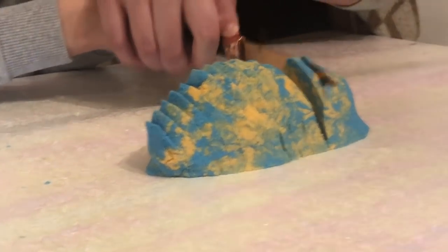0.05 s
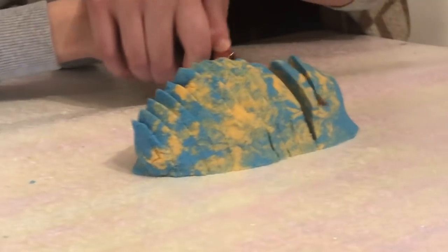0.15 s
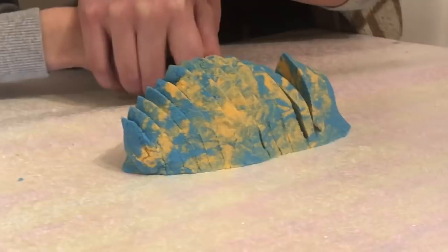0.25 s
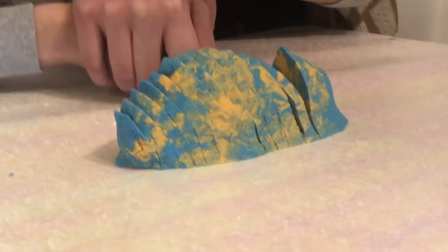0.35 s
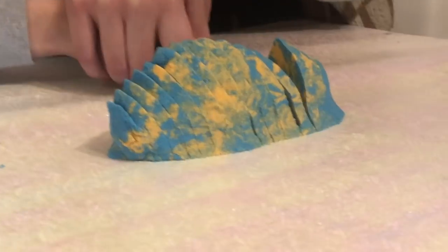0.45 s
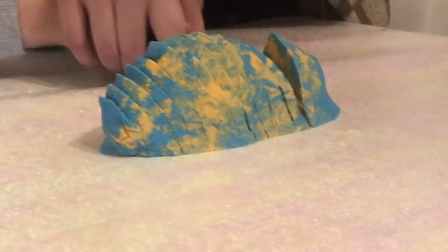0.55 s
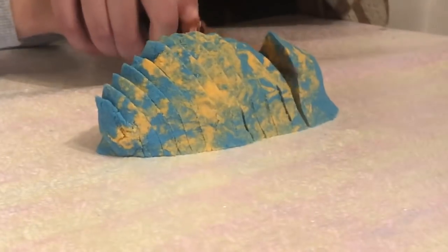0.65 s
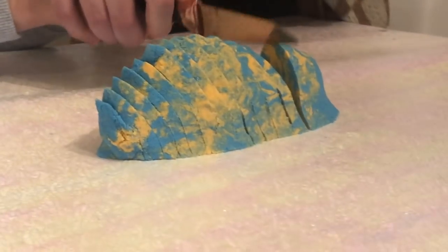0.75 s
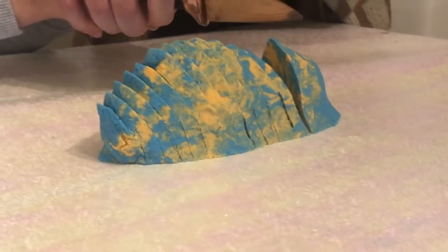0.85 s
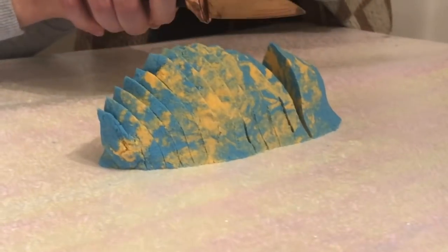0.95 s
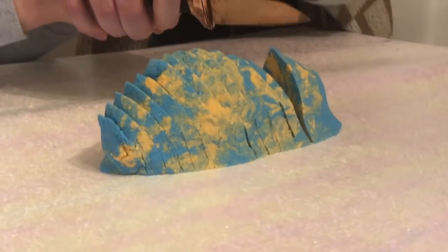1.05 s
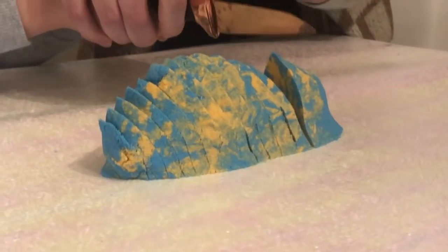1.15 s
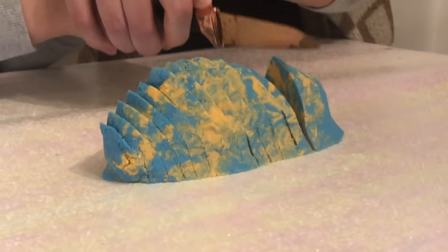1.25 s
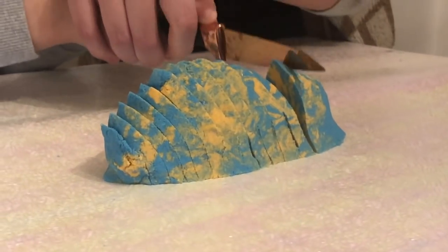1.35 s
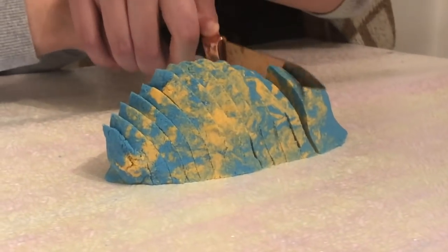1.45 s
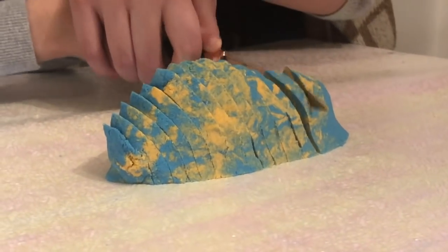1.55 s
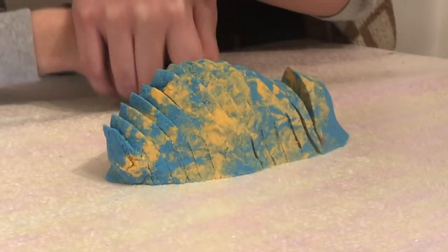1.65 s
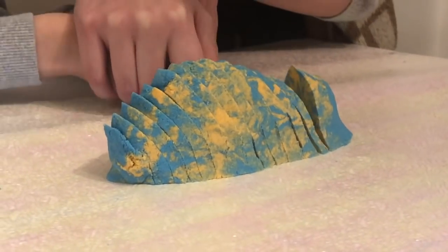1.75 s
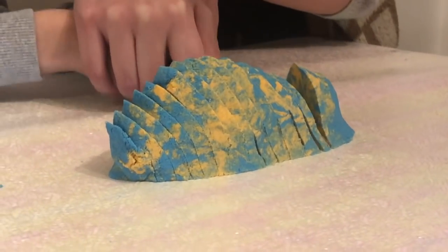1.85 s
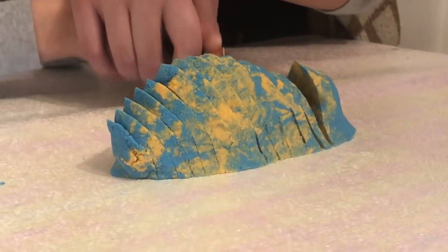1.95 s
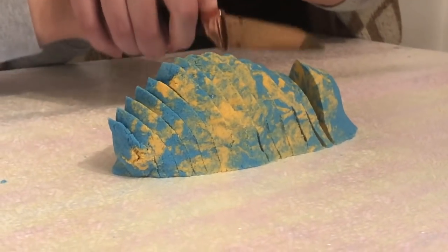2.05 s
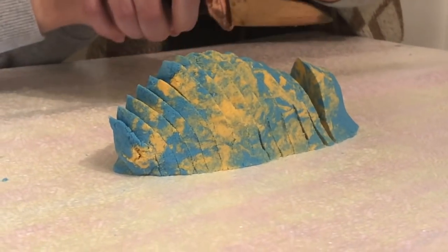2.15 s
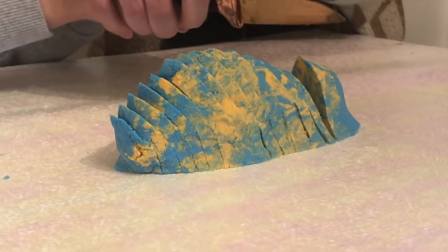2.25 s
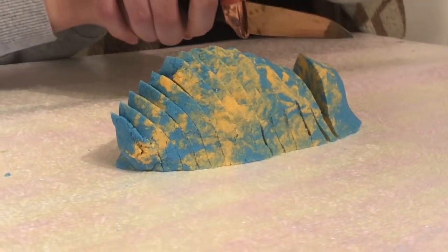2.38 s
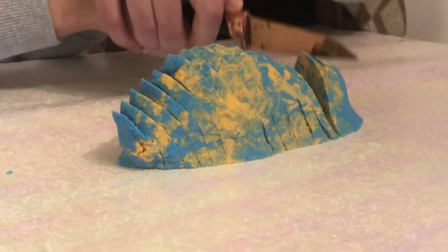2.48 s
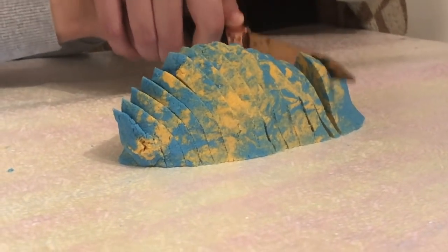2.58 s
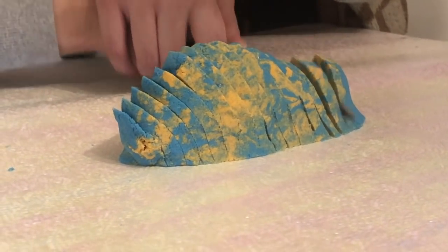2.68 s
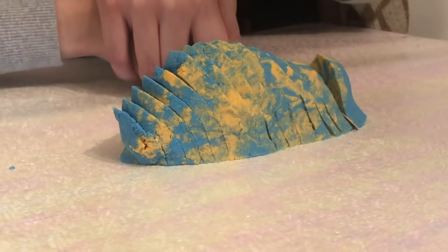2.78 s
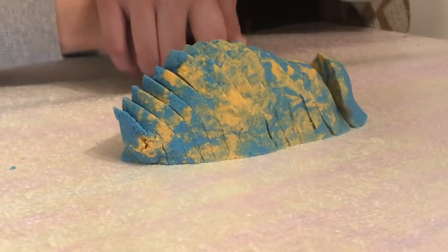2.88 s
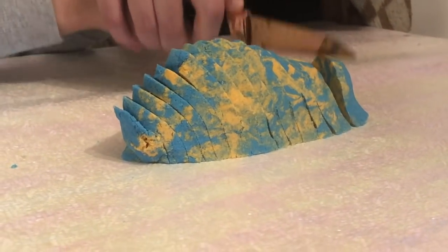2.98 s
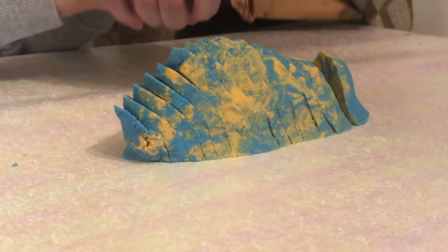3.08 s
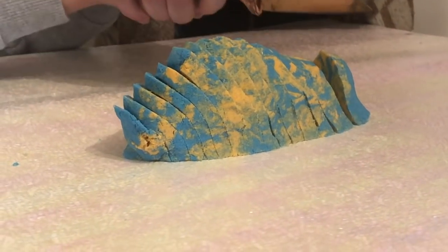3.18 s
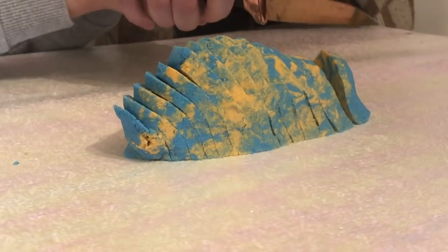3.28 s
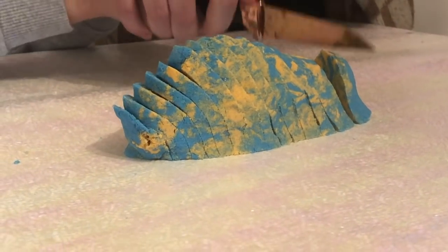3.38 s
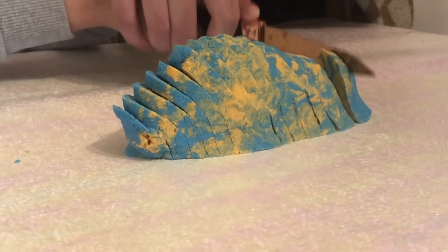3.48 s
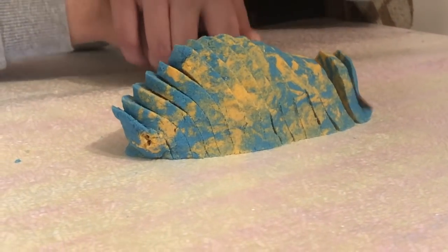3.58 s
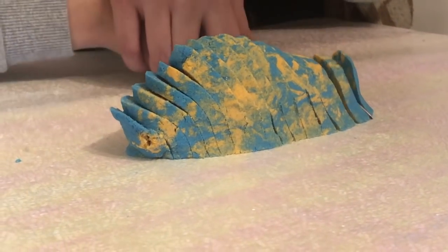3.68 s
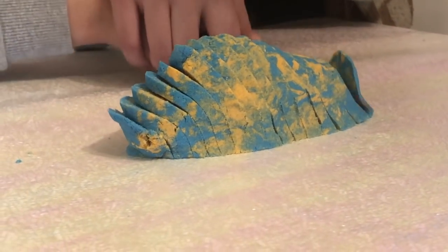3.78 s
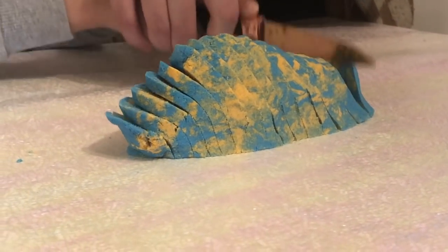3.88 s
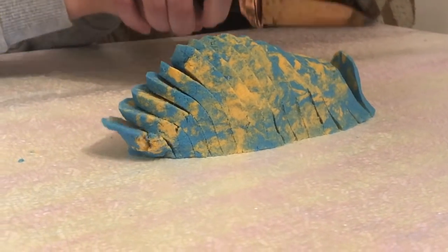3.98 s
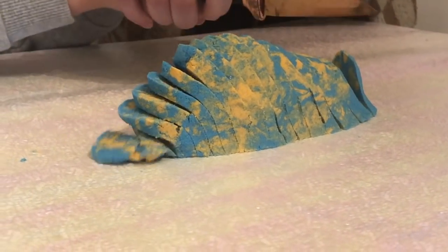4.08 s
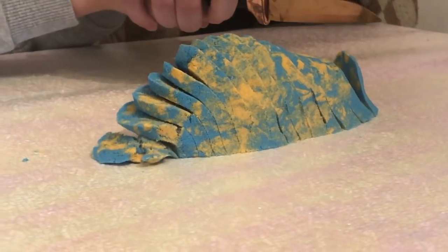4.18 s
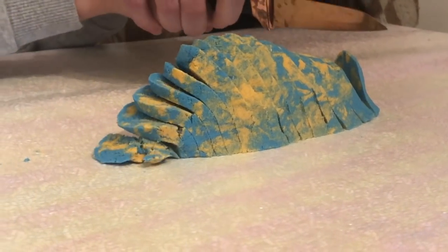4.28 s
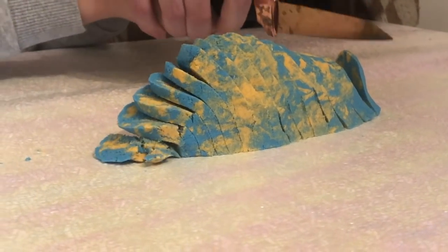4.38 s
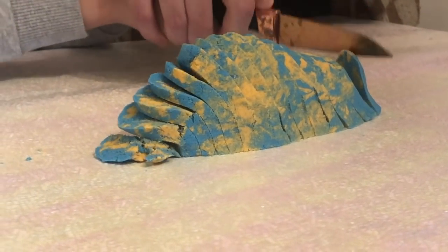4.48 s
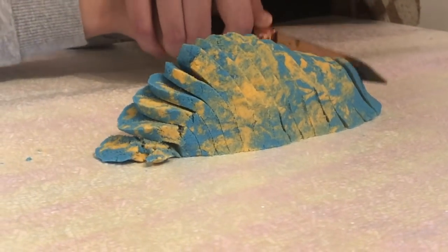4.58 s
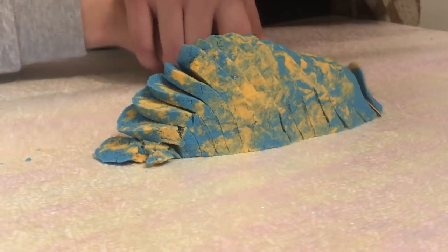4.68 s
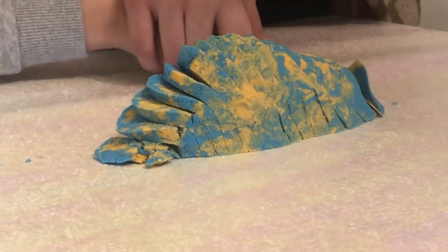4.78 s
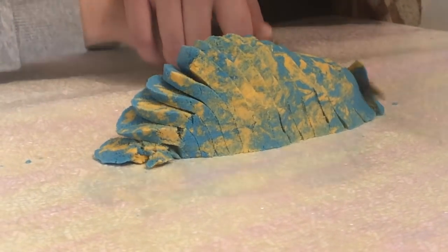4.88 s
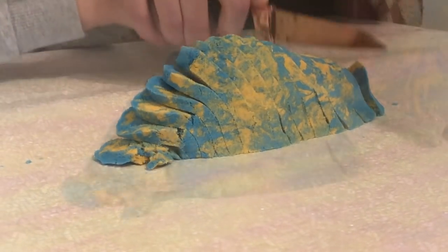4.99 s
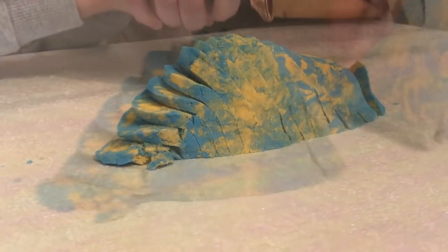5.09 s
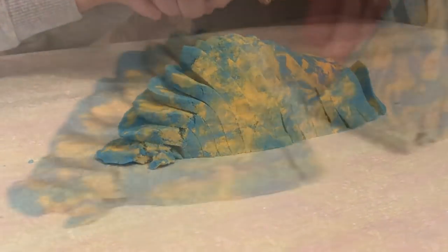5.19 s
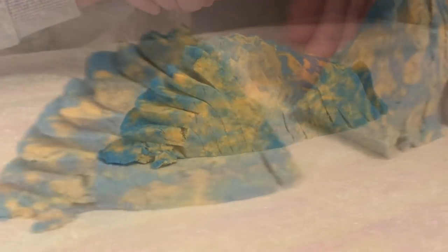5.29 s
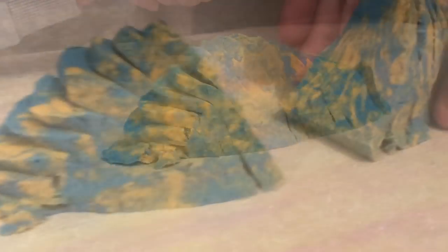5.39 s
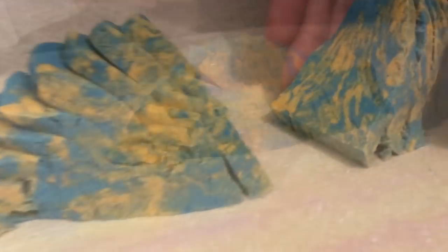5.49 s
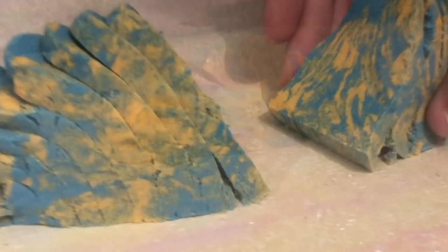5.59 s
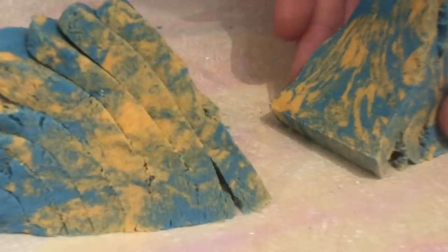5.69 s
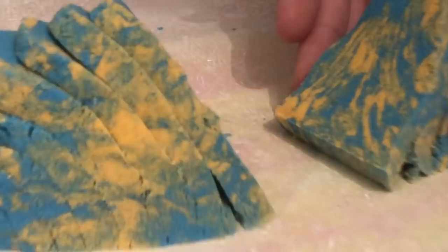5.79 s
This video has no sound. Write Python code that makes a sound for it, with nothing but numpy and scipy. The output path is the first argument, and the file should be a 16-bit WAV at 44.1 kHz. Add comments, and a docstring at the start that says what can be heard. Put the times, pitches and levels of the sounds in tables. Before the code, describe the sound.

Close, dry sand cutting: five soft gritty slices, each ending in a crisp knock and woody thump, then a faint sandy slide.

```python
"""Small room, microphone close to a table: a knife slices five times through a block of moulded sand.
Random grain clicks, coloured as shudder, rub and hiss, follow the sinking blade; each landing is crushed
grit plus decaying knife and table modes. Between cuts loose sand brushes the blade, with ticks, bumps and
one squeak; last, the sand is pushed across the table. Room reflections and a low murmur lie behind."""
import sys
import numpy as np
from scipy import signal
from scipy.fft import rfft, irfft
from scipy.io import wavfile

SR = 44100
rng = np.random.default_rng(int(sys.argv[2]) if len(sys.argv) > 2 else 0)


def persist_wave(psi):
    """Save psi, clipped to +-1, as 16-bit WAV."""
    counts = np.round(np.clip(psi, -1, 1) * 32767).astype(np.int16)
    wavfile.write(sys.argv[1], SR, np.atleast_2d(counts).T)


N = 257525
T = np.arange(N) / SR
RING = T[:int(0.8 * SR)]  # time axis of one struck sound [s]


def undb(db):
    """Amplitude factor of a level in dB."""
    return 10 ** (np.asarray(db) / 20)


def unit(x):
    """Scale to rms 1."""
    return x / np.sqrt(np.mean(x ** 2))


def add(out, s, x):
    """Mix x into out from time s."""
    i = max(int(s * SR), 0)
    out[i:i + len(x)] += x[:N - i]


def fade(t60):
    """Exponential decay by 60 dB in t60 seconds."""
    return np.exp(-np.log(1000) * RING / t60)


def gate(start, end, attack, release):
    """Rise linearly from start, hold until end, then die away exponentially."""
    rise = np.clip((T - start) / attack, 0, 1)
    return rise * np.exp(-np.maximum(T - end, 0) / release)


def colour(x, points, peaks=()):
    """Shape x by a smooth spectrum with resonances on top; rms 1."""
    spectrum = rfft(x)
    hz = np.maximum(np.arange(len(spectrum)) * SR / len(x), 1)
    at, db = np.transpose(points)
    gain_db = np.interp(np.log(hz), np.log(at), db)
    for centre, width, peak_db in peaks:
        gain_db = gain_db + peak_db / (1 + (2 * (hz - centre) / width) ** 2)
    return unit(irfft(spectrum * undb(gain_db), len(x)))


def walk(rate):
    """Random wander through `rate` new values a second, with a spread near 1."""
    steps = rng.standard_normal(4096)
    return np.interp(T * rate, np.arange(len(steps)), steps)


def grains(rate, spread_db):
    """Sand grains slipping: random clicks, `rate` a second, some larger than the rest."""
    sign = np.sign(rng.standard_normal(N))
    size_db = spread_db * np.minimum(rng.exponential(size=N), 4)
    return (rng.random(N) < rate / SR) * sign * undb(size_db)


# The five cuts: (blade enters [s], blade is down [s], shudder of the pressed block [dB],
#   rub at full depth before its trim [dB], growth of the rub over the cut [dB],
#   hiss at the edge before its trim [dB], time for the edge to bite [s])
CUTS = [(0.0, 0.383, -46, -42, 25, -65, 0.023), (1.415, 1.78, -48, -41, 36.5, -64.5, 0.0035),
        (2.582, 2.801, -47, -44, 29, -63.5, 0.015), (3.499, 3.724, -46.5, -45, 24.5, -64.5, 0.072),
        (4.57, 4.809, -52.5, -46, 39, -65, 0.2)]
# Colour of the shuddering block: (frequency [Hz], relative level [dB])
SHUDDER_COLOUR = [(45, -42.5), (90, -3.5), (160, 1.5), (220, -7), (270, -8.5), (350, -7.5), (520, -12.5),
                  (750, -28.5), (2000, -53)]
# Colour of sand rubbing the blade's flanks: (frequency [Hz], relative level [dB])
RUB_COLOUR = [(200, -19.5), (400, -5.5), (550, 4), (820, -8), (1300, -9), (1900, -10.5), (2900, -15.5),
              (4100, -17), (6000, -23), (10000, -26.5), (16000, -41)]
# Resonances that the rubbing excites: (frequency [Hz], width [Hz], boost [dB])
RUB_PEAKS = [(1060, 18, 13.5), (1383, 110, 11.5), (1731, 150, 10), (2485, 120, 5)]
# Colour of the hiss at the edge: (frequency [Hz], relative level [dB])
HISS_COLOUR = [(1000, -7), (3000, -8), (6200, -6.5), (7800, -10), (9200, -5.5), (10300, -1), (11700, -3),
               (13300, -2.5), (15800, -2.5)]
# The thin edge sings in the stream of grains: (frequency [Hz], width [Hz], boost [dB])
EDGE_PEAKS = [(10690, 400, 1.5), (12230, 510, 8)]
DEPTH_CURVE = 1.023  # near 1: the rub grows almost steadily in dB with depth
SHUDDER_ARCH = 0.98  # exponent of the arch: the block shudders most halfway through


def slicing(rub_trim_db=1.5, hiss_trim_db=2.5, rub_attack=0.0088, rub_release=0.035,
            hiss_hold=0.022, hiss_release=0.03):
    """Grains stream past the blade in uneven slips: the edge hisses, the rub on the flanks grows with depth."""
    press, flanks, edge = np.zeros((3, N))
    for start, end, press_db, flank_db, growth_db, edge_db, bite in CUTS:
        depth = np.clip((T - start) / (end - start), 0, 1)
        press += undb(press_db) * (4 * depth * (1 - depth)) ** SHUDDER_ARCH
        rub_level_db = flank_db - growth_db * (1 - depth) ** DEPTH_CURVE
        flanks += undb(rub_level_db) * gate(start, end, rub_attack, rub_release)
        edge += undb(edge_db) * gate(start, end + hiss_hold, bite, hiss_release)
    slips = undb(0.8 * walk(60))
    shudder = colour(grains(1500, 0.99), SHUDDER_COLOUR) * press
    rub = undb(rub_trim_db) * colour(grains(9000, 4.2), RUB_COLOUR, RUB_PEAKS) * flanks
    hiss = undb(hiss_trim_db) * colour(grains(11000, 3.0), HISS_COLOUR, EDGE_PEAKS) * edge
    return shudder + slips * (rub + hiss)


# Blade meets table: (time [s], table thump [dB], blade knock [dB], crushed grit [dB], knock pitch factor,
#   knock tilt [dB per octave], grit tilt [dB per octave], ring of the edge [dB])
TAPS = [(0.3946, -24, -24, -23.5, 0.97, -18, 3, -14), (1.7683, -24.5, -10.5, -17.5, 1.05, 1, -2.5, 15),
        (2.8154, -24, -17.5, -27, 0.99, -3, -1, -4), (3.7279, -27, -23.5, -21, 1.08, -11, -1, 9),
        (3.7361, -37.5, -23.5, -27, 1.05, -2.5, 0.5, 5), (4.7874, -30, -23.5, -28, 1.02, 8, 2.5, 2)]
# Colour of the crushed grit before its tilt: (frequency [Hz], relative level [dB])
GRIT_COLOUR = [(500, -12.5), (1400, 1), (2000, 0.5), (2800, -7.5), (3400, -1), (4500, -1), (6800, -6.5),
               (7600, -9.5), (9000, -8.5), (12000, -16.5), (15500, -23)]
# Modes of the blade pressed on the board, before pitch factor and tilt:
#   (frequency [Hz], relative level [dB], decay t60 [s])
KNOCK_MODES = [(1072, -26, 0.024), (1364, -4, 0.035), (1671, 3.5, .022), (1734, -14.5, .16),
               (1821, 1.5, 0.021), (2072, -10.5, .04), (2405, -20, 0.028), (3370, -13, 0.021),
               (4390, -26, 0.014), (5530, -24.5, 0.018), (6704, -29, 0.0044)]
EDGE_HZ, EDGE_WIDTH_HZ = 14100, 3500  # ring of the thin edge as it lands


def taps(knock_lag=0.0007, thump_lag=0.00342, crush_t60=0.019, settle_db=-27, settle_t60=0.15,
         push=0.0004, contact=0.011, damped_db=-8):
    """The edge crushes the last grains, the blade knocks, and the table's slower bending waves follow."""
    out = np.zeros(N)
    rise = 1 - np.exp(-RING / push)
    # the blade swings freely for some cycles, then the board damps it
    swing = rise * undb(damped_db * np.clip(2 * (RING / contact - 1), 0, 1))
    # a short crack, then the disturbed grains settle
    crush = np.sqrt(rise) * (fade(crush_t60) + undb(settle_db) * fade(settle_t60))
    for s, thump_db, knock_db, grit_db, pitch, knock_tilt_db, grit_tilt_db, edge_db in TAPS:
        spectrum = [(hz, db + grit_tilt_db * np.log2(hz)) for hz, db in GRIT_COLOUR]
        edge_ring = [(EDGE_HZ, EDGE_WIDTH_HZ, edge_db)]
        grit = colour(rng.standard_normal(len(RING)), spectrum, edge_ring)
        knock = np.zeros(len(RING))
        for hz, db, t60 in KNOCK_MODES:
            mode_db = db + knock_tilt_db * np.log2(hz / 1700)
            knock += undb(mode_db) * fade(t60) * np.sin(2 * np.pi * hz * pitch * RING)
        add(out, s, undb(grit_db) * grit * crush)
        add(out, s + knock_lag, undb(knock_db) * knock * swing)
        add(out, s + thump_lag, undb(thump_db) * table(0.0011, scatter_db=0.98))
    return out


# Modes of the table top, before the scatter of each blow:
#   (frequency [Hz], relative level [dB], decay t60 [s])
TABLE_MODES = [(92.2, -16.5, 0.47), (98, -13.5, 0.22), (127.5, -10.5, 0.26), (171.8, -7.5, .22),
               (217.5, -5, .11), (295.7, -9.5, 0.23), (320, -4.5, 0.17), (341.9, -2, 0.26),
               (398.3, 4, 0.13), (458, 0, 0.12), (487, 7.5, 0.059), (494, -9, 0.26), (527.3, -6, .26),
               (576, -9, 0.069), (707, -14.5, 0.27), (841, -10.5, .24), (920, -23.5, .25),
               (940.3, -11, 0.18), (1049, -12, 0.27)]


def table(length, scatter_db=3.9):
    """Modes ring a little differently for every blow; a longer push (length in s) dulls the sound."""
    ring = np.zeros(len(RING))
    for (hz, db, t60), chance in zip(TABLE_MODES, rng.standard_normal(len(TABLE_MODES))):
        ring += undb(db + scatter_db * chance) * fade(t60) * np.cos(2 * np.pi * hz * RING)
    force = np.sin(np.pi * np.minimum(RING[:int(length * SR) + 2] / length, 1)) ** 2
    blow = signal.fftconvolve(ring, force / force.sum())
    # below its lowest mode the top hardly radiates
    low_cut = signal.butter(3, 80, "high", fs=SR, output="sos")
    return signal.sosfilt(low_cut, blow)


# The block crosses the table in one swell, its colour: (frequency [Hz], relative level [dB])
PUSH_COLOUR = [(240, -41), (400, -14), (438, 3.5), (496, -8), (1150, -15), (1880, -11), (2360, -17),
               (5000, -15), (15500, -23)]
PUSH_PEAK_S, PUSH_DB = 5.725, -55  # time of the greatest speed, level there
PUSH_RISE_S, PUSH_FALL_S = 0.26, 0.17


def pushing(spread_db=2.5):
    """The block scrapes over the table; the level of its grain clicks follows the rise and fall of speed."""
    width = np.where(T < PUSH_PEAK_S, PUSH_RISE_S, PUSH_FALL_S)
    speed = np.exp(-((T - PUSH_PEAK_S) / width) ** 2)
    return undb(PUSH_DB) * colour(grains(9000, spread_db), [(150, -22), *PUSH_COLOUR]) * speed


# Loose sand sliding on the moving blade between cuts: (start [s], length [s], level [dB])
BRUSHES = [(0.575, .26, -68), (1.93, .18, -68.5), (3.036, 0.087, -69), (4.018, 0.12, -74),
           (4.505, 0.15, -74), (5.038, 0.25, -69.5)]
# Colour of that sliding sand: (frequency [Hz], relative level [dB])
SWISH_COLOUR = [(150, -24), (450, 0.5), (900, -2), (1800, 4), (2600, 0), (4500, -2.5), (7000, -4.5),
                (12000, -11.5), (16000, -16)]


def brushing(attack=0.01, release=0.071):
    """Loose sand slides along the moving blade as a swish of random grain clicks."""
    motion = sum(undb(db) * gate(s, s + length, attack, release) for s, length, db in BRUSHES)
    return colour(grains(9000, 2.6), SWISH_COLOUR) * motion


# Small ticks of knife and crumbs: (time [s], level [dB], frequency [Hz], decay t60 [s])
TICKS = [(0.089, -57.5, 6450, 0.027), (0.178, -52, 9500, 0.034), (0.592, -66.5, 11000, 0.05),
         (0.995, -66.5, 4280, 0.062), (1.062, -62, 11600, .02), (1.902, -47, 7850, 0.007),
         (2.079, -59, 3950, 0.18), (2.212, -66.5, 8750, 0.071), (2.326, -62.5, 3580, 0.079),
         (2.37, -65, 6100, 0.091), (2.94, -54.5, 7000, 0.016), (3.069, -60, 2400, 0.11),
         (4.082, -63.5, 2500, 0.051), (4.191, -61, 13300, 0.026), (4.368, -65.5, 2350, 0.11),
         (5.227, -63.5, 2500, 0.13)]
# Soft bumps of the hand on the table: (time [s], level [dB], push length [s])
BUMPS = [(0.692, -58.5, 0.0016), (1.778, -22.5, 0.0072), (2.605, -29, 0.013), (2.960, -30.5, 0.0079)]


def handling(tick_width=0.27, tick_peak_db=23):
    """Ticks are decaying noise around one resonance; bumps are soft pushes on the table's modes."""
    out = np.zeros(N)
    for s, db, hz, t60 in TICKS:
        resonance = [(hz, tick_width * hz, tick_peak_db)]
        noise = rng.standard_normal(len(RING))
        tick = colour(noise, [(300, -26), (2000, -7), (16000, -3)], resonance)
        add(out, s, undb(db) * tick * fade(t60))
    for s, db, length in BUMPS:
        add(out, s, undb(db) * table(length))
    return out


SQUEAK_S, SQUEAK_HZ, SQUEAK_DB = 1.293, 1374, -53.5  # start, settled pitch, level
SQUEAK_FLAT_HZ, SQUEAK_GLIDE_S, SQUEAK_DECAY_S = 55, 0.022, 0.04  # starts flat, glides up, dies away


def squeak(octave_db=-23, attack=0.003):
    """A short, thin rubbing tone before the second cut, rising a little, with a weak octave."""
    hz = SQUEAK_HZ - SQUEAK_FLAT_HZ * np.exp(-np.maximum(T - SQUEAK_S, 0) / SQUEAK_GLIDE_S)
    phase = 2 * np.pi * np.cumsum(hz) / SR
    shape = gate(SQUEAK_S, SQUEAK_S + attack, attack, SQUEAK_DECAY_S)
    return undb(SQUEAK_DB) * shape * (np.sin(phase) + undb(octave_db) * np.sin(2 * phase))


# Reflections of the small room: (frequency [Hz], reverberant level [dB], decay t60 [s])
ROOM_BANDS = [(80, -16, 0.43), (255, -7.5, 0.8), (500, -10, 0.5), (983, -6, 0.7), (1836, -12.5, 0.61),
              (3930, -7, 0.48), (8090, -12, 0.33), (15000, -8.5, .27)]


def room(x, gap=0.0064, build=0.0037):
    """Diffuse reflections arrive after a short gap (s); each band of noise decays at its own rate."""
    hz, db, t60 = np.transpose(ROOM_BANDS)
    noise = rfft(rng.standard_normal(len(RING)))
    bin_hz = np.maximum(np.arange(len(noise)) * SR / len(RING), 1)
    # position of each bin among the overlapping bands
    place = np.interp(np.log(bin_hz), np.log(hz), np.arange(len(hz)))
    tail = np.zeros(len(RING))
    for k in range(len(hz)):
        shape = fade(t60[k]) * np.clip((RING - gap) / build, 0, 1)
        band = irfft(noise * np.maximum(1 - abs(place - k), 0), len(RING))
        tail += undb(db[k]) * band * shape / np.sqrt(np.sum(shape ** 2))
    return signal.fftconvolve(x, tail)[:N]


# Colour of the murmur of the room: (frequency [Hz], relative level [dB])
AIR_COLOUR = [(25, -23.5), (45, -7.5), (62, -3.5), (78, -7.5), (110, -4), (220, 2), (400, -6), (650, -16),
              (1600, -22.5), (2500, -28.5), (5000, -32), (16000, -37)]
AIR_DB = -57.5
HUM_HZ, HUM_DB = 98, -65


def air():
    """The low, steady murmur of the room, coloured noise, and a faint hum, one sine."""
    murmur = undb(AIR_DB) * colour(rng.standard_normal(N), AIR_COLOUR)
    return murmur + undb(HUM_DB) * np.sin(2 * np.pi * HUM_HZ * T)


def scene():
    """Everything on the table, heard close by in the room."""
    direct = slicing() + taps() + pushing() + brushing() + handling() + squeak()
    return (direct + room(direct) + air())[None]


def record(dry):
    """The microphone sheds the deepest rumble, and the top is cut steeply at 15.9 kHz."""
    low_cut = signal.butter(2, 45, "high", fs=SR, output="sos")
    top_cut = signal.ellip(10, 0.2, 70, 15900, fs=SR, output="sos")
    return signal.sosfilt(top_cut, signal.sosfilt(low_cut, dry))


dry = scene()
out = record(dry)
persist_wave(out)
```